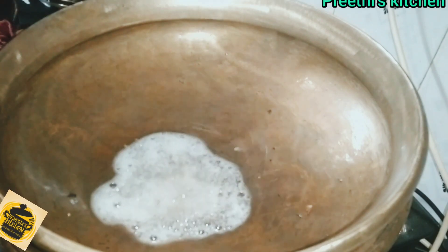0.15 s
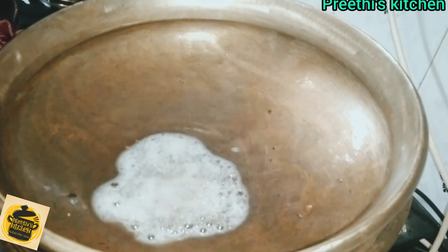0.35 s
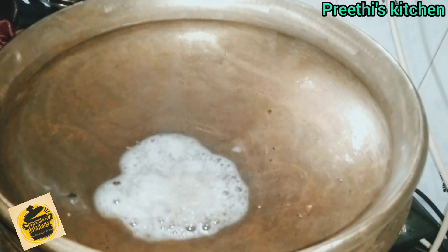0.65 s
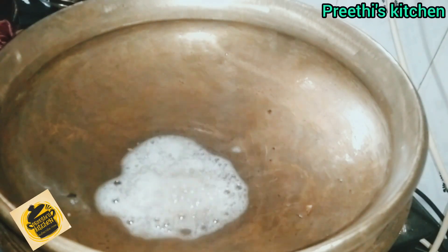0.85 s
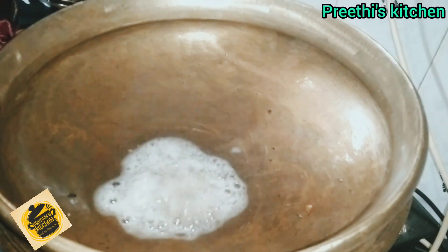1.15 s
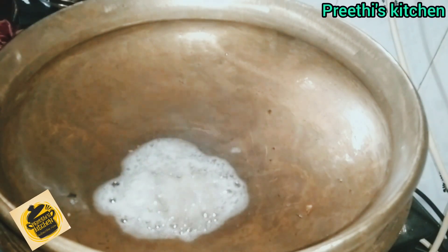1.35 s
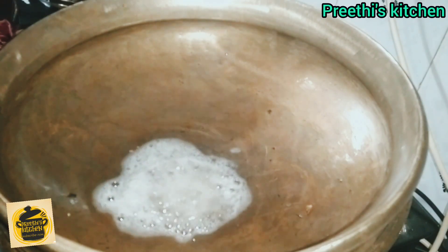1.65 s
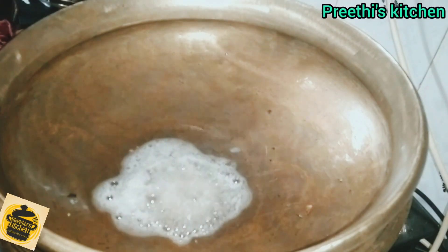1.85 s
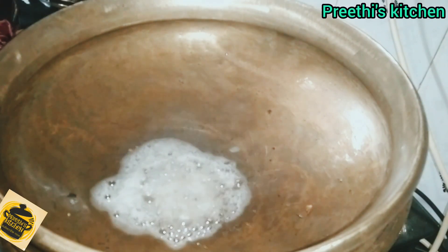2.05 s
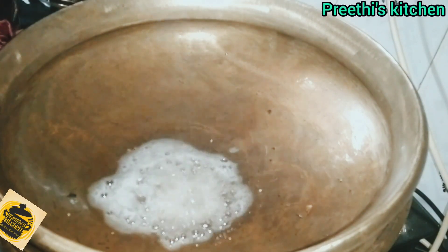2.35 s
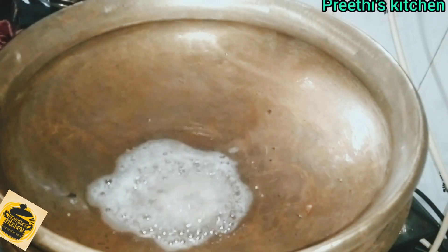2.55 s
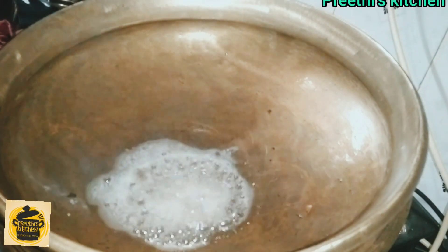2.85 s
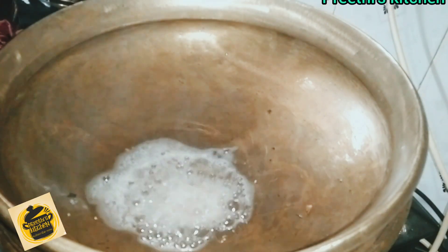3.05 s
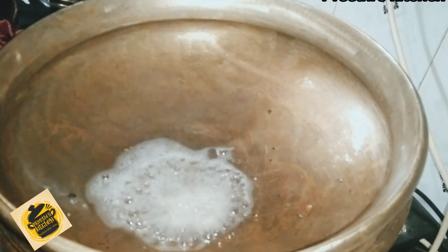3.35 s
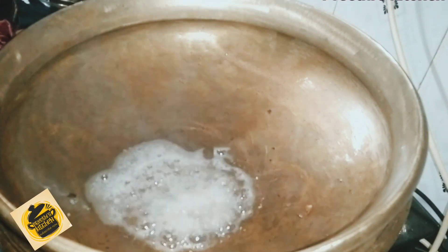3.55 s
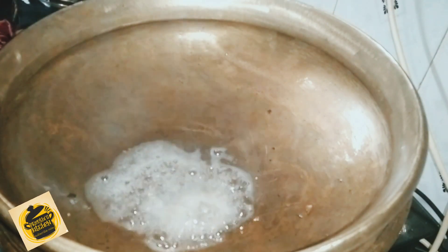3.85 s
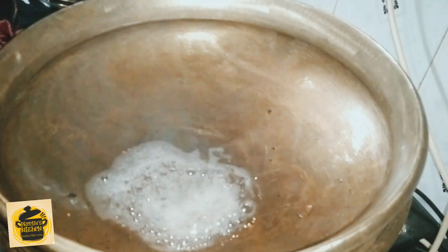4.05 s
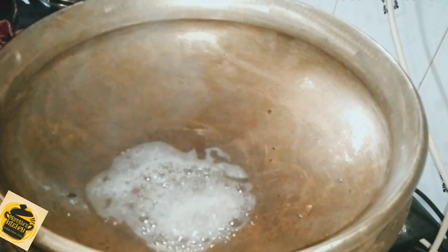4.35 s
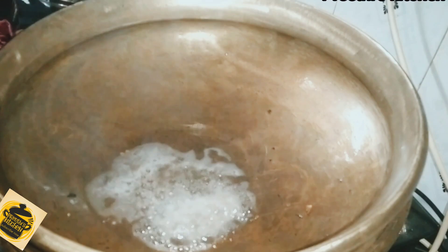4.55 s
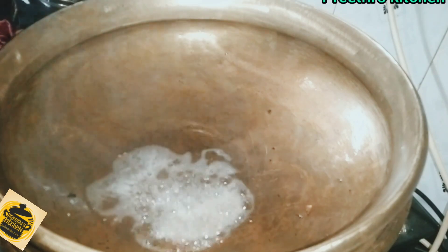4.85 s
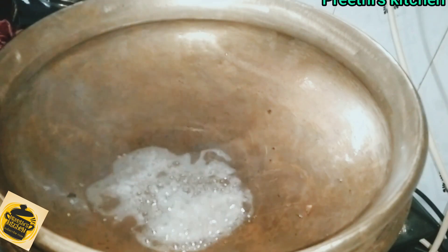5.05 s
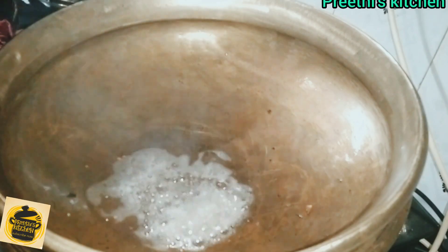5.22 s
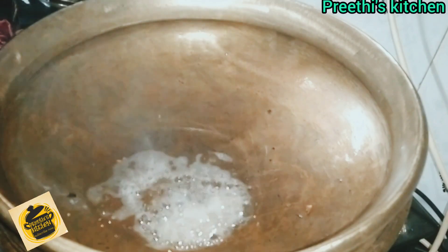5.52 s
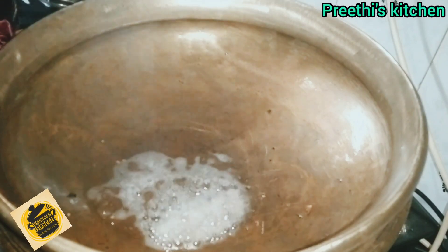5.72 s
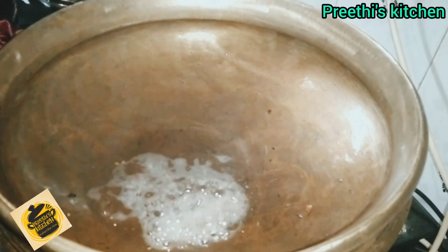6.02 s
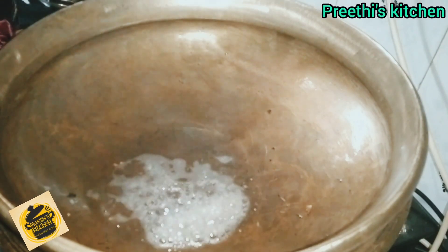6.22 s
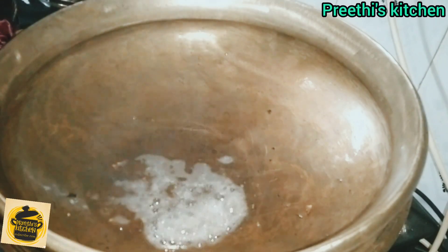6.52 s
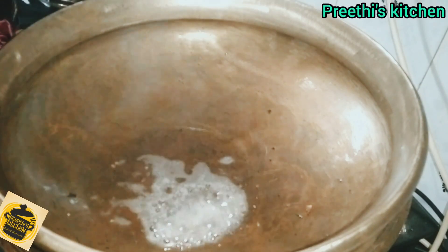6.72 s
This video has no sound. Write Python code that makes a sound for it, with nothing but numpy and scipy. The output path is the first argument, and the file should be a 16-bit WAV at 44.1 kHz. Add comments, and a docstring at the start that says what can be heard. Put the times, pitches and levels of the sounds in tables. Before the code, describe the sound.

A steady sizzle of hot oil in a metal pot, punctuated by crisp snaps as seeds burst, some followed by rough little spurts of steam. It starts sparse, becomes busiest in the middle, then eases off with isolated bright pops. Close microphone over the pot, identical in both channels, slightly dull at the very top, with faint burner rush and hum behind.

```python
"""Seeds spluttering in hot oil

Small seeds splutter in a pool of hot oil at the bottom of a wide metal pot, heard from just above the rim.
Filtered grains of noise make a steady foam fizz; each seed cracks as a sharp pulse with echoes off the pot walls.
Some seeds then let out a rough, sagging puff of steam, made from fluttering noise around a falling pitch.
The splutter swells and thins out over stove rush and a low hum; both channels carry the same sound.
"""
import sys
import numpy as np
from scipy import signal
from scipy.fft import rfft, irfft, next_fast_len
from scipy.io import wavfile
from scipy.ndimage import uniform_filter1d

SR = 44100
rng = np.random.default_rng(int(sys.argv[2]) if len(sys.argv) > 2 else 0)


def master_out(mix):
    """Clip the mix to full scale and print it as 16-bit PCM to the path in sys.argv[1]."""
    frames = np.transpose(np.atleast_2d(mix))
    ceiling = np.clip(frames, -1, 1)
    pcm = np.round(ceiling * 32767).astype(np.int16)
    wavfile.write(sys.argv[1], SR, pcm)


N = 303407
TIME = np.arange(N) / SR

# Dry seeds cracking. Each row: start in seconds, level in dB before trim, brightness in dB per octave
# before trim, level of the spatter that follows in dB relative to its usual gain.
DRY_SEEDS = [(.37, -38, -4.5, 3), (.403, -31.5, 3, -1.5), (0.456, -33, -2, 5), (.484, -32.5, -2, -7),
             (.578, -35, 12, -2.5), (.618, -36.5, 2, -18), (.647, -29, -1.5, -0.5), (0.9954, -26, -5, -5.5),
             (1.065, -31, -7.5, 5.5), (1.1322, -32.5, -9, -5), (1.198, -34.5, 0.5, -7),
             (1.2877, -37, -8.5, 3.5), (1.354, -30, 3, -5), (1.375, -27.5, 3, -1), (1.556, -27.5, 0, 1),
             (1.658, -27.5, -14.5, 2), (1.676, -21, -1.5, -3), (1.7321, -20.5, -1, -11),
             (1.835, -30.5, -5.5, -9), (2.0011, -22.5, -6, -4), (2.025, -17.5, 1, -6.5),
             (2.0911, -22.5, -4, -6), (2.1105, -22, -0.5, -10), (2.1568, -24, 5.5, -5),
             (2.2417, -27.5, -7, -6), (2.3136, -21.5, -3, 3), (2.3808, -21, -1, -22),
             (2.4006, -21.5, 2, -20), (2.48, -25, -7.5, -5), (2.553, -26, 0.5, 1), (2.6309, -23, -8, -11),
             (2.665, -25, -2.5, -1), (2.7434, -19, 1, -10), (2.7863, -24, -0.5, 2), (2.826, -26.5, -10, -6),
             (2.842, -27.5, 2, -4), (2.9161, -17.5, -2, -8), (2.9854, -26.5, -1, -10),
             (3.0457, -20, -2, -7), (3.132, -19, 1, -0.5), (3.199, -22, 1, -15.5), (3.2342, -22.5, 0, -2),
             (3.2723, -23, -0.5, -12), (3.2938, -21, 1, -5), (3.3021, -22.5, 5, -5),
             (3.338, -29.5, -9, -10), (3.5074, -24.5, -3, 1), (3.5172, -22, 0.5, 8), (3.5995, -19, 1, -3),
             (3.615, -27, -1.5, 2), (3.695, -26, -1, -4), (3.721, -25.5, -2.5, -3),
             (3.7688, -23.5, -1, -15), (3.825, -24, -2.5, -14), (3.8452, -21.5, -0.5, -17),
             (3.9476, -27, -2.5, -9), (4.012, -24.5, 1, -1), (4.02, -27, 0, 1), (4.055, -22.5, -3, -9),
             (4.0908, -21, 0, -2.5), (4.1098, -21, -0.5, -14), (4.31, -28, 1.5, 14),
             (4.3448, -22, -0.5, 2.5), (4.4179, -23.5, -0.5, -14), (4.468, -34, 5, -18),
             (4.518, -35.5, 1.5, 5), (4.5359, -19.5, 0, -11), (4.552, -25.5, -1, -8), (4.5646, -19, 2, -5),
             (4.582, -23, -2.5, -4), (4.628, -26, -6, 7.5), (4.7399, -25.5, -4, -11),
             (4.7635, -25, -1, -10), (4.7971, -25.5, -0.5, 3), (4.862, -23.5, 1, -3), (4.878, -26, -1, -3),
             (4.902, -18.5, 0.5, -9), (4.9418, -22.5, 3, -22), (5.0443, -19.5, 7, -6), (5.108, -25, 6, -10),
             (5.1382, -21.5, -0.5, -0.5), (5.2253, -21.5, -0.5, -9), (5.271, -28, -3, -3),
             (5.341, -24.5, -2, -4), (5.39, -29.5, 1, -2), (5.4121, -26.5, -1.5, -1), (5.5606, -22, 1, -9),
             (5.569, -24, -2, -5), (5.585, -27.5, 2, 8), (5.6007, -15.5, 4, -11), (5.8573, -19, 7.5, -8),
             (5.8993, -25.5, -2, -12), (5.9024, -24.5, 0.5, -1), (6.126, -31, 5, -1),
             (6.2034, -27.5, 7, -5), (6.335, -25, 15.5, -17), (6.414, -29, 5, -2),
             (6.4536, -19.5, 0.5, -16), (6.469, -27.5, 4, 0), (6.639, -26, 3, -8), (6.6921, -24, 1, -8),
             (6.8148, -24.5, 10, -8)]
# Moist seeds that crack and puff. Each row: start in seconds, crack level in dB before trim, brightness in
# dB per octave before trim, puff level in dB before trim, pitch it settles on in Hz, clear note in it in dB.
MOIST_SEEDS = [(.7459, -19, -4.5, -39, 1957, -17), (1.0274, -21.5, -7, -43, 2553, -10),
               (1.0926, -24.5, -13.5, -46, 1467, -8), (1.3609, -22.5, -1.5, -31, 2964, 5),
               (1.51, -27.5, -6, -39, 1110, -12), (1.6214, -22, -3.5, -40, 3440, -8),
               (1.882, -17.5, -3.5, -27.5, 2480, -6), (1.9487, -20, -3.5, -32, 1600, -6),
               (2.2223, -20.5, -7, -30, 2273, -9), (2.2936, -21, -4, -39, 2250, -6),
               (2.5091, -17, 0.5, -33, 2665, -6), (2.694, -23, -1, -40, 2100, -6),
               (3.0135, -18.5, -5, -34, 2250, -6), (3.211, -22.5, -3.5, -43, 1993, -6),
               (3.4019, -20, -3, -32, 2042, -10), (3.4309, -22.5, -3, -32.5, 2050, -6),
               (3.8682, -20, -8.5, -29, 1995, -5), (3.98, -25.5, -7, -33.5, 2003, -13),
               (4.229, -21, -3, -28, 3430, -8), (4.3666, -21, 7.5, -24.5, 1710, 4),
               (4.407, -29, 0, -40, 1730, 0), (4.689, -18, -3, -32, 3340, -12),
               (5.0132, -20.5, -5, -33.5, 2045, -14), (5.4225, -15.5, 2, -31.5, 3230, -5),
               (5.7117, -18.5, -3.5, -29.5, 1765, 1), (6.3467, -28, -4.5, -44, 2560, -8),
               (6.4396, -28.5, -5.5, -30, 2098, -7), (6.8252, -23, -3.5, -35.5, 2986, -4)]
# Frying foam over time. Each row: time in seconds, coarse bubbles in dB before trim, fine fizz in dB before trim.
FOAM_LEVELS = [(0, -49, -45.5), (.5, -48.5, -46.5), (1.3, -46, -43), (2.03, -38.5, -42.5),
               (2.68, -34, -41.5), (3.31, -35.5, -39.5), (4.3, -40.5, -39.5), (4.9, -40.5, -41.5),
               (5.2, -43, -41.5), (5.8, -44.5, -40), (6.09, -47, -45), (6.88, -52, -46)]
# Spectrum of a crack. Each row: frequency in Hz, relative level in dB.
CRACK_SPECTRUM = [(60, -50), (200, -47), (500, -21.5), (750, -15), (950, -7.5), (1250, -9), (1700, -3),
                  (3000, 2), (4400, 3), (5500, 1), (7500, 1.5), (16000, -8)]
# Spectrum of the coarse bubbles and the oil spray. Each row: frequency in Hz, relative level in dB.
BUBBLE_SPECTRUM = [(100, -45), (400, -25), (950, -11), (1250, -3), (1600, 5.5), (2500, 4), (4200, 1.5),
                   (5500, -43), (9000, -14.5)]
# Spectrum of the fine fizz. Each row: frequency in Hz, relative level in dB.
FIZZ_SPECTRUM = [(200, -50), (2000, -26), (3500, -4.5), (4300, -2.5), (5200, -2.5), (7500, 1),
                 (10000, -5.5), (16000, -4.5)]
# Spectrum of the stove's rush. Each row: frequency in Hz, relative level in dB.
STOVE_SPECTRUM = [(25, -32), (50, -22), (75, -14), (105, 5), (135, -6), (185, -15.5), (275, 0.5),
                  (340, -2.5), (420, -8.5), (570, -3), (700, -9), (1000, -9.5), (2000, -16), (6000, -28.5)]
# Steady hum of the kitchen. Each row: frequency in Hz, rms level in dB.
HUM_TONES = [(99.6, -63.5), (279, -71.5), (605, -64)]
# Echoes from the pot's walls. Each row: typical delay in seconds, gain as a plain factor.
WALL_ECHOES = [(.00112, 0.48), (.0018, 0.73), (.0024, 0.074), (.0056, .17), (.0066, 0.19)]
# Treble response of the microphone. Each row: frequency in Hz, gain in dB.
MIC_RESPONSE = [(7600, -1), (8300, -7.5), (9200, -16), (10200, -24), (12000, -31), (15500, -28)]
# Resonances of the air in the bowl. Each row: frequency in Hz, t60 in seconds, dB over the unresonant sound.
BOWL_MODES = [(587, 0.12, 13), (975, 0.027, 3.5), (1523, 0.024, 1), (1700, 0.23, -1.5), (1997, .15, 7.5),
              (2500, 0.1, -1.5), (2550, 0.075, -1), (2775, 0.041, 0), (3417, 0.023, 1), (3670, 0.055, -7),
              (4330, 0.016, 2.5), (4480, 0.05, -11), (5320, 0.031, -5), (6040, 0.032, -2),
              (7050, 0.073, 0.5)]
# Long-ringing modes of the metal. Each row: frequency in Hz, t60 in seconds, dB over the unresonant sound.
METAL_MODES = [(1738, .5, 5), (2064, .3, 1), (3007, .45, 5)]

# a dry crack with zero brightness in its row rings at CAVITY_HZ; brighter ones ring higher
CAVITY_HZ, CAVITY_OCT_PER_DB = 4540, 0.73
# treble gain of a crack when the coarse bubbles' row level is BUSY_FOAM_DB, its slope and its scatter
BUSY_FOAM_DB, SNAP_DB, SNAP_PER_DB, SNAP_SCATTER_DB = -33, 4.5, 0.6, 3
# a strong puff is spent sooner: t60 at USUAL_PUFF_DB, halved every PUFF_HALVING_DB
USUAL_PUFF_DB, PUFF_T60_S, PUFF_HALVING_DB = -34.5, 0.2, 18
STOVE_DB, TOP_HZ = -51, 15800
LEAD_S = 0.0007  # cracks are placed this much early, as their pulse sits just after the start


def undb(db):
    """Decibels to gain."""
    return 10 ** (np.asarray(db) / 20)


def unit(x):
    """Scale to rms 1."""
    return x / np.sqrt(np.mean(x ** 2))


def fade(t, t60):
    """Exponential decay by 60 dB in t60 seconds."""
    return np.exp(-np.log(1000) * t / t60)


def colour(x, points, tilt_db=0, note_hz=1000, note_db=0, pivot_hz=3600, note_width=0.41):
    """Filter by a (Hz, dB) spectrum, tilted within an octave of the pivot, with one broad resonance."""
    size = next_fast_len(len(x) + 256)
    octave = np.log2(np.maximum(np.fft.rfftfreq(size, 1 / SR), 1))
    hz, db = np.transpose(points)
    gain_db = np.interp(octave, np.log2(hz), db)
    gain_db += tilt_db * np.clip(octave - np.log2(pivot_hz), -1, 1)
    gain_db += note_db * np.exp(-((octave - np.log2(note_hz)) / note_width) ** 2)
    return irfft(rfft(x, size) * undb(gain_db), size)[:len(x)]


def add(out, s, x):
    """Mix x into out from time s on."""
    i = int(round(s * SR))
    out[i:i + len(x)] += x[:max(len(out) - i, 0)]


def crack(tilt_db, note_hz, spatter_db, note_db, scatter=0.12, scatter_t60=0.03, spatter_t60=0.096,
          spatter_gain=0.12, wander=0.09, spike_db=0.1):
    """One burst: a pressure spike, its echoes off the walls, then a spray of tiny droplets."""
    size, lead = 3072, 32  # samples
    t = np.arange(size - lead) / SR
    burst = scatter * rng.standard_normal(len(t)) * fade(t, scatter_t60) * (1 - np.exp(-t / 0.0009))
    # spattery or bright bursts get a slightly stronger spike
    burst[0] += undb(spike_db * (max(spatter_db + 1, 0) + max(tilt_db, 0)))
    for lag, gain in WALL_ECHOES:
        # the paths depend on where the seed lies
        path_s = lag * np.exp(wander * rng.standard_normal())
        add(burst, path_s, np.array([gain]))
    # droplets come in uneven clumps of about 1/700 s
    clumps = np.repeat(rng.exponential(size=size), SR // 700)[:len(t)]
    droplets = unit(rng.standard_normal(len(t)) * np.sqrt(clumps))
    spatter_shape = fade(t, spatter_t60) * (1 - np.exp(-(t / 0.0017) ** 2))
    burst += spatter_gain * undb(spatter_db) * droplets * spatter_shape
    sound = colour(np.pad(burst, (lead, 0)), CRACK_SPECTRUM, tilt_db, note_hz, note_db)
    # level it by its first 1/180 s as the microphone hears it
    head = colour(sound, MIC_RESPONSE)[:SR // 180]
    return sound / np.sqrt(np.mean(head ** 2))


def snap(burst, s):
    """Fierce frying tears seeds more abruptly, and an abrupt tear holds more treble above 8 kHz."""
    times, coarse_db, _ = np.transpose(FOAM_LEVELS)
    db = SNAP_DB + SNAP_PER_DB * (np.interp(s, times, coarse_db) - BUSY_FOAM_DB)
    db += SNAP_SCATTER_DB * rng.standard_normal()
    return colour(burst, [(8000, 0), (11500, db)])


def pops(gain_db=-3.5, bright_db=0.93, note_db=2.5):
    """Dry seeds: one crack each, with its own strength and colour."""
    out = np.zeros(N)
    for s, db, tilt_db, spatter_db in DRY_SEEDS:
        note_hz = CAVITY_HZ * 2 ** (CAVITY_OCT_PER_DB * tilt_db)
        burst = crack(tilt_db + bright_db, note_hz, spatter_db, note_db)
        add(out, s - LEAD_S, undb(db + gain_db) * snap(burst, s))
    return out


def splits(gain_db=-5.0, bright_db=1.0, spatter_db=-4, note_ratio=0.99, note_db=5.5):
    """Moist seeds crack open, ringing just under the pitch their puff settles on."""
    out = np.zeros(N)
    for s, db, tilt_db, _, hz, _ in MOIST_SEEDS:
        burst = crack(tilt_db + bright_db, note_ratio * hz, spatter_db, note_db)
        add(out, s - LEAD_S, undb(db + gain_db) * snap(burst, s))
    return out


def jets(gain_db=-1.5, width=0.27, fall=0.237, fall_s=0.01528, spray_db=-7.5, clear_s=0.035,
         linger=1.6, sputter_db=2.0):
    """Steam sputters in the split husk and sprays oil; the pitch sags into a clearer note that lingers."""
    out, t = np.zeros(N), np.arange(SR // 3) / SR
    for s, _, _, db, hz, clear_db in MOIST_SEEDS:
        t60 = PUFF_T60_S * 2 ** ((USUAL_PUFF_DB - db) / PUFF_HALVING_DB)
        phase = 2 * np.pi * np.cumsum(hz * (1 + fall * np.exp(-t / fall_s))) / SR
        # slow noise on both quadratures makes a band of noise that follows the pitch
        slow = signal.butter(2, width * hz / 2, fs=SR, output="sos")
        flutter = unit(signal.sosfilt(slow, rng.standard_normal((2, len(t)))))
        rush = unit(flutter[0] * np.cos(phase) + flutter[1] * np.sin(phase))
        # cubed noise is spiky, like separate droplets
        spray = unit(colour(rng.standard_normal(len(t)) ** 3, BUBBLE_SPECTRUM))
        unevenness = unit(uniform_filter1d(rng.standard_normal(len(t)), size=200))
        sputter = undb(sputter_db * unevenness)
        note = undb(clear_db) * (1 - np.exp(-t / clear_s)) * np.cos(phase) * fade(t, linger * t60)
        puff = (rush + undb(spray_db) * spray) * sputter * fade(t, t60) + note
        onset_rms = np.sqrt(np.mean(puff[:SR // 40] ** 2))
        add(out, s, undb(db + gain_db) * puff / onset_rms)
    return out


def ticks(foam_db, gain_db=1.0, spread_db=4.0, bright_db=2.2, calm_db=-47.5, busy_db=-40, count=300):
    """Small bursts at random: few while the foam is calm, more and stronger as it gets busy."""
    out = np.zeros(N)
    for when, note, size, tint, luck in rng.random((count, 5)):
        lively_db = foam_db[int(when * N)]
        if lively_db > calm_db + luck * (busy_db - calm_db):
            tick = crack(bright_db + 8 * (tint - 0.5), 1800 * 4 ** note, -6, 9)
            level_db = lively_db + gain_db + 2 * spread_db * (2 * size - 1.5)
            add(out, when * N / SR, undb(level_db) * tick)
    return out


def grains(rate, spread_db, tail_t60, smear=1.44):
    """Dense tiny clicks of very uneven size, smeared inside the pot."""
    size = undb(spread_db * np.minimum(rng.exponential(size=N), 5))
    clicks = (rng.random(N) < rate / SR) * size * rng.choice([-1, 1], N)
    t = np.arange(SR // 50) / SR
    # noise that follows the decaying power of the clicks; power falls twice as fast in dB
    power = signal.fftconvolve(clicks ** 2, fade(t, tail_t60 / 2))[:N]
    haze = unit(np.sqrt(np.abs(power)) * rng.standard_normal(N))
    return unit(clicks) + smear * haze


def foam(coarse_db, fine_db, coarse_gain_db=-8, fine_gain_db=-0.5):
    """Water boils out of the seeds: coarse bubbles and a fine fizz, each from dense clicks per second."""
    coarse = unit(colour(grains(rate=1500, spread_db=1.5, tail_t60=0.04), BUBBLE_SPECTRUM))
    fine = unit(colour(grains(rate=5800, spread_db=4.0, tail_t60=0.044), FIZZ_SPECTRUM))
    return coarse * undb(coarse_db + coarse_gain_db) + fine * undb(fine_db + fine_gain_db)


def pot(x):
    """The metal and the air in the bowl ring on as decaying modes after every burst."""
    t = np.arange(SR // 2) / SR
    ring = np.zeros(len(t))
    for hz, t60, db in BOWL_MODES + METAL_MODES:
        decay = fade(t, t60)
        # dividing by the decay's sum sets the gain at resonance
        ring += undb(db) * 2 * np.cos(2 * np.pi * hz * t) * decay / decay.sum()
    return x + signal.fftconvolve(x, ring)[:N]


def room(x, wet_db=-9.0, long_t60=0.43, short_t60=0.21, build_s=0.013):
    """A small tiled kitchen: a decaying noise tail whose treble thins out first."""
    t = np.arange(SR // 2) / SR
    noise = rng.standard_normal(len(t))
    warm = colour(noise, [(2500, 5.6), (6000, 1.2)])
    # the tail starts as plain noise and turns into the warmer noise
    tail = warm * fade(t, long_t60) + (noise - warm) * fade(t, short_t60)
    tail *= 1 - np.exp(-(t / build_s) ** 2)
    return x + undb(wet_db) * signal.fftconvolve(x, tail / np.sqrt(np.sum(tail ** 2)))[:N]


def kitchen():
    """The low rush of the stove as filtered noise, and a steady hum of sines."""
    hum = np.zeros(N)
    for hz, db in HUM_TONES:
        hum += undb(db) * np.sqrt(2) * np.sin(2 * np.pi * (hz * TIME + rng.random()))
    rush = unit(colour(rng.standard_normal(N), STOVE_SPECTRUM))
    return hum + undb(STOVE_DB) * rush


def scene():
    """Everything in the oil sounds through the pot and into the room."""
    times, coarse_points, fine_points = np.transpose(FOAM_LEVELS)
    coarse_db = np.interp(TIME, times, coarse_points)
    fine_db = np.interp(TIME, times, fine_points)
    oil = pops() + splits() + jets() + ticks(fine_db) + foam(coarse_db, fine_db)
    mix = room(pot(oil)) + kitchen()
    return np.tile(mix, (2, 1))


def record(dry):
    """The microphone dulls the high treble and a steep low-pass cuts off above TOP_HZ."""
    heard = np.array([colour(channel, MIC_RESPONSE) for channel in dry])
    return signal.sosfilt(signal.ellip(8, 0.2, 70, TOP_HZ, fs=SR, output="sos"), heard)


dry = scene()
out = record(dry)
master_out(out)
```